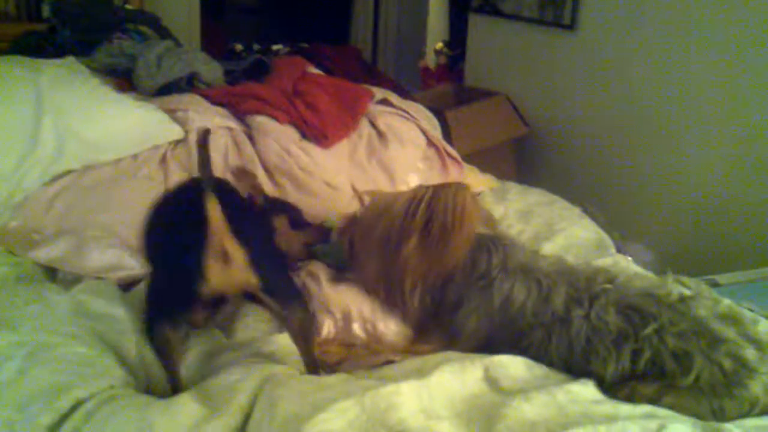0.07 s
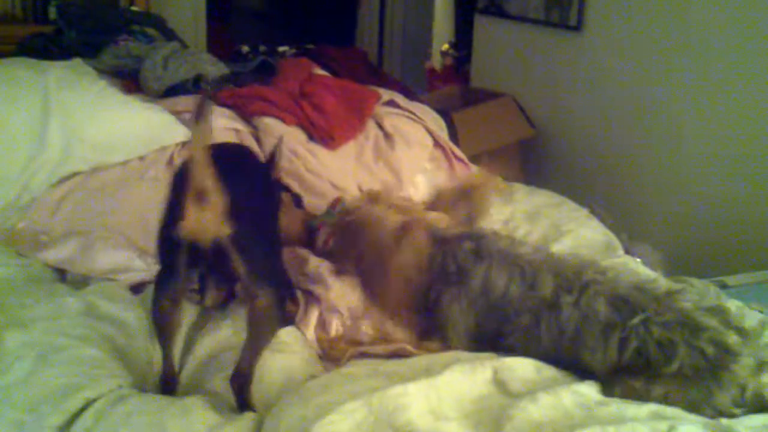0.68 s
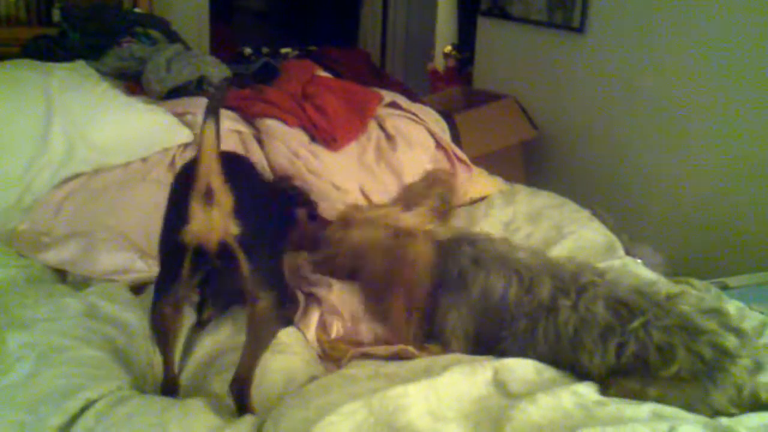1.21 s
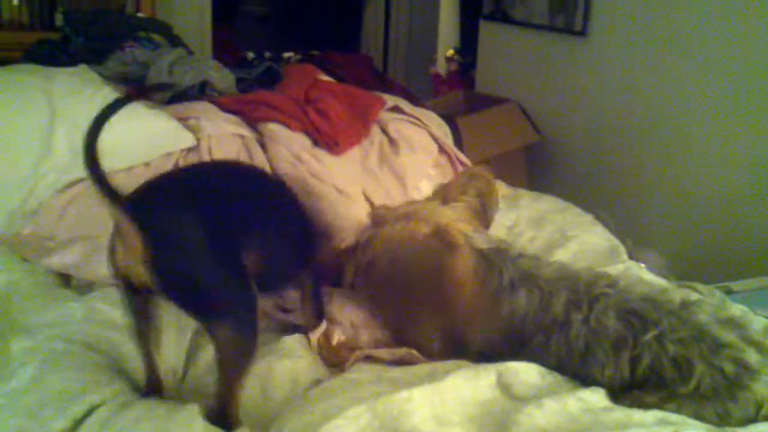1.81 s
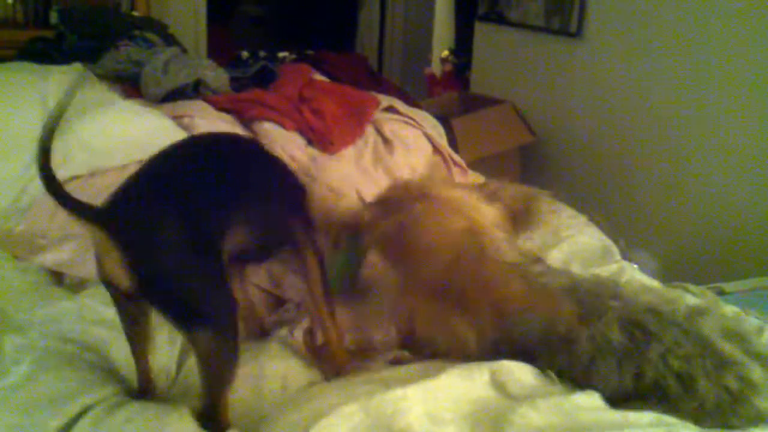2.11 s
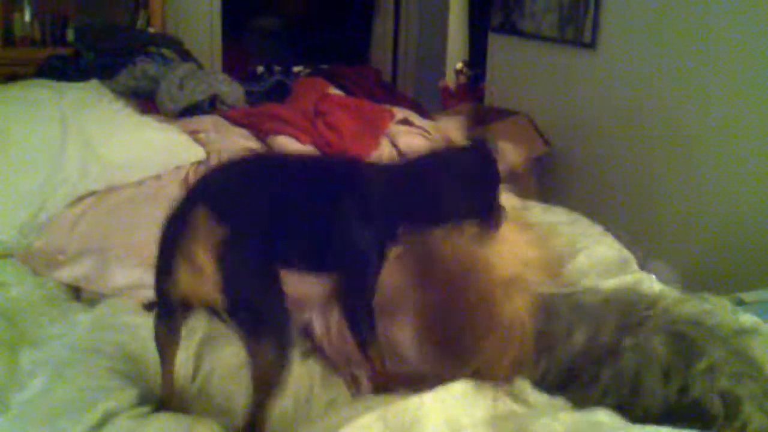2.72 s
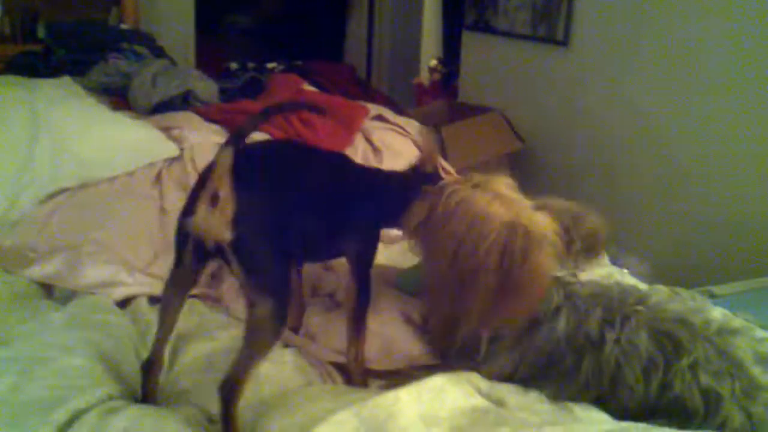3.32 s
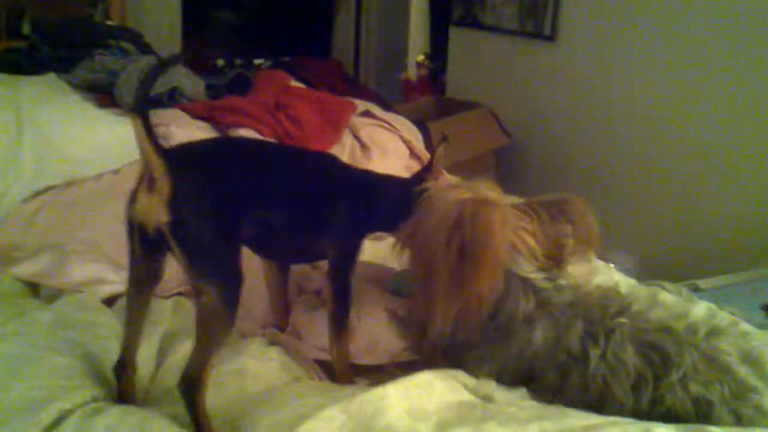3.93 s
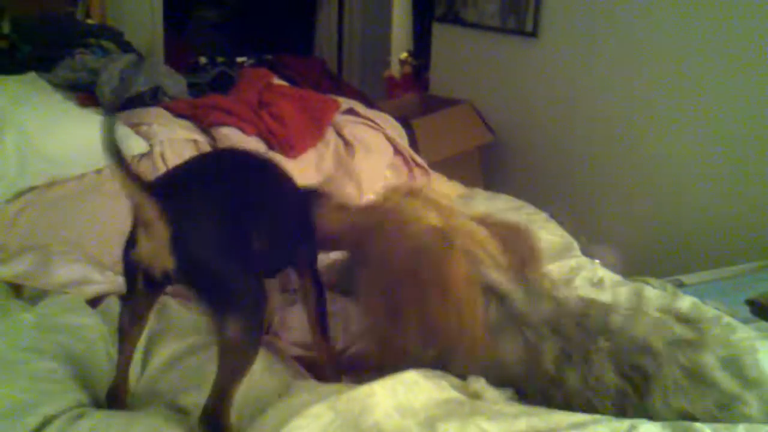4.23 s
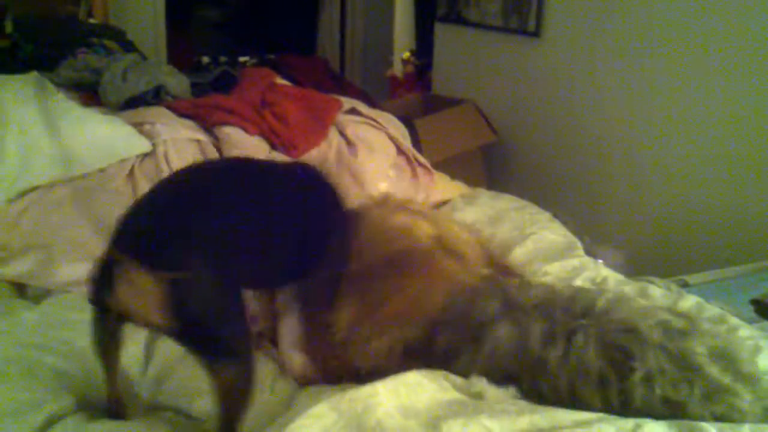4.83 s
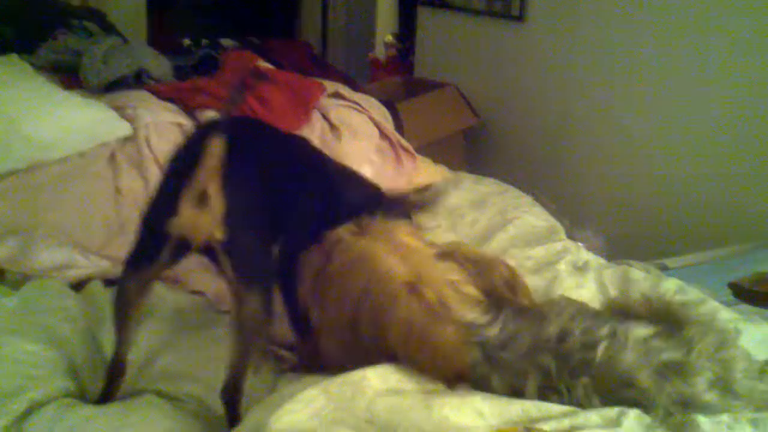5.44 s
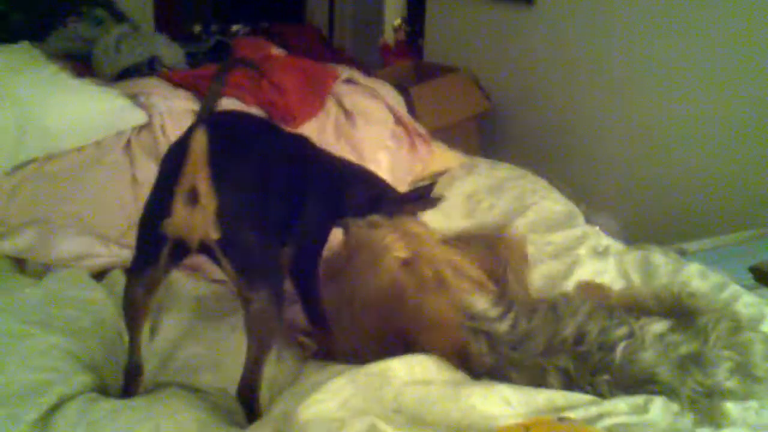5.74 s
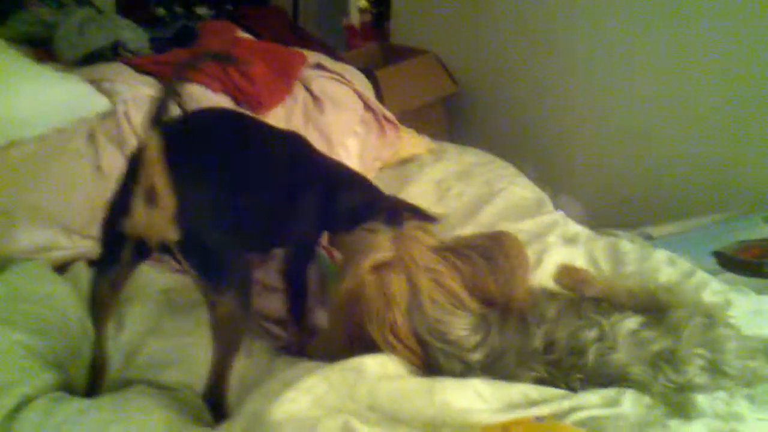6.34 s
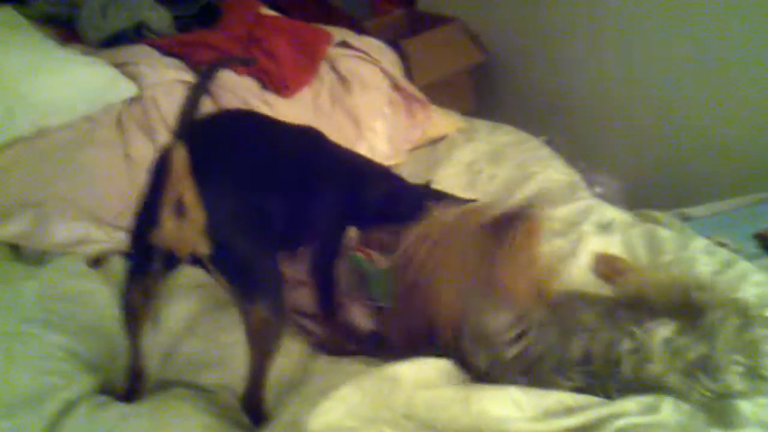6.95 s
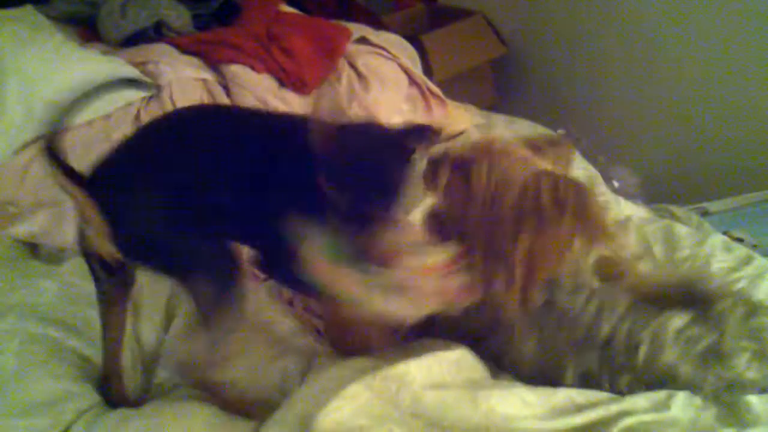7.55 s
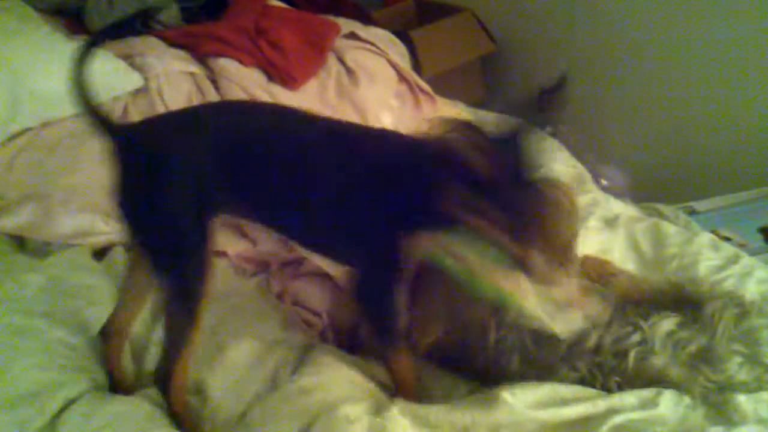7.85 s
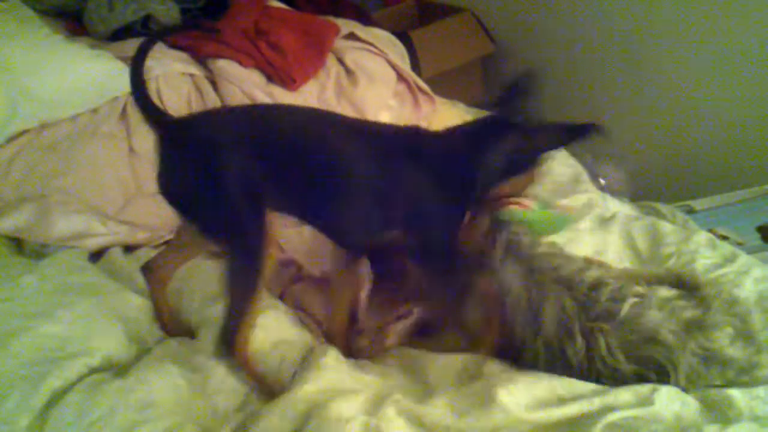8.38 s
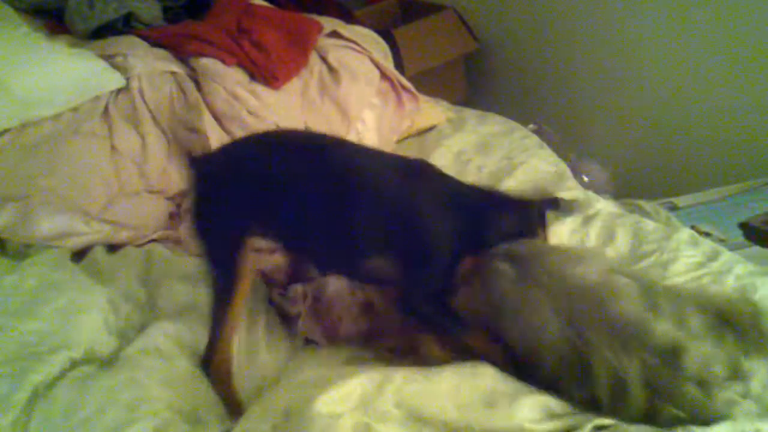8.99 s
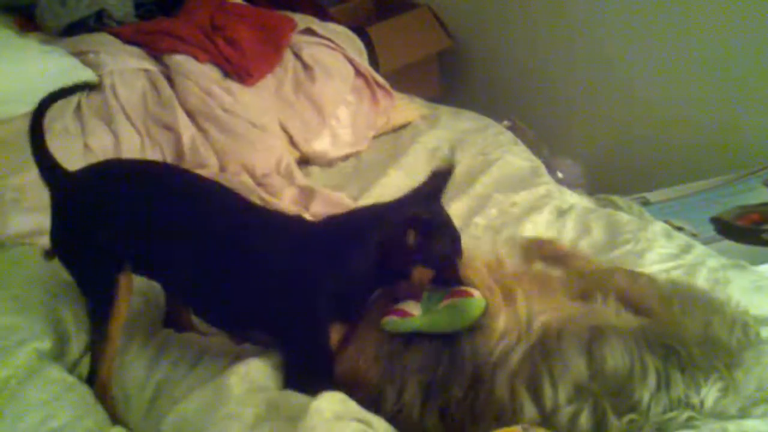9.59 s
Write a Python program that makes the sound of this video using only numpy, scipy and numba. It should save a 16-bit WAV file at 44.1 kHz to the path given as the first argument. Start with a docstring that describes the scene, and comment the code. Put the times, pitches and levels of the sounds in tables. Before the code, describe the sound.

Playful, raspy growls from two small dogs come in clusters in a small room, over light rustling and soft hiss.

```python
"""Two small dogs growl in short, gruff bursts as they tug at a toy on a bed.
Each growl is a source and a filter: uneven vocal-fold pulses excite the resonances of throat and mouth,
and turbulent air rasps on each pulse. Effort swells, sags and is let go; tugs curl back the lips.
Teeth clack and the bedding rustles. A small bedroom reverberates over faint air and hiss,
and two microphone ports are cross-subtracted into a wide stereo picture."""
import sys
import numpy as np
from scipy import signal
from scipy.fft import rfft, irfft, next_fast_len
from scipy.io import wavfile
from scipy.ndimage import uniform_filter1d
from numba import njit

SR = 44100
rng = np.random.default_rng(int(sys.argv[2]) if len(sys.argv) > 2 else 0)


def put_to_file(sound):
    """Save the sound as 16-bit audio at rate SR, in the file named by the first command-line argument."""
    columns = np.atleast_2d(sound).T  # one column per channel
    safe = np.clip(columns, -1, 1)
    whole_steps = np.round(safe * 32767)
    wavfile.write(sys.argv[1], SR, whole_steps.astype(np.int16))


N = 426006
PORT_LAG = 17  # travel time of sound between the two ports, in samples


def dogs(release_s=0.22, pitch_lag_s=0.04, rasp_rise_db_per_s=8, surge_db=0.72):
    """Breath effort modulates the voice: level, pitch, brightness and rasp follow each growl's course."""
    # growls, valued at the crest: start_s, swell_s, hold_s, release_db_per_s, level_db, pitch_hz,
    # arch_octaves, bright_db, drift_db_per_s, rasp_db, mouth_shape, jitter_cycles, tone_db
    growls = [(1.72, 0.13, .14, 260, -51, 130, 0.23, -2.5, -16, -15, "shut", 0.18, -7.5),
              (1.835, 0.14, 0.23, 418, -40.5, 130.3, 0.055, -9.5, 3, -27.5, "shut", 0.07, -1.5),
              (2.296, 0.15, 0.34, 190, -37, 165.3, .2, -3, -17, -17, "bared", 0.11, -6.5),
              (2.893, .15, 0.4, 480, -38, 148, .22, -9, -14, -16.5, "shut", 0.12, -7),
              (4.135, 0.16, 0.27, 480, -39.5, 147.3, 0.18, -9, 14, -21.5, "clenched", 0.1, -1),
              (4.5, 0.028, 0.071, 262.5, -53.5, 154.1, 0.093, -10.5, 3, -14, "bared", 0.21, -4),
              (4.577, 0.18, 0.22, 300, -33, 171.5, 0.23, -8, -16, -18.5, "bared", .07, -1),
              (5.157, .14, 0.38, 400, -34.5, 169.7, .22, -6.5, -29, -17, "clenched", .09, -9.5),
              (7.281, 0.092, 0.14, 400, -41.5, 149.8, 0.16, -2, -10, -17.5, "snarl", 0.17, -3.5),
              (7.587, 0.09, 0.085, 452, -46, 133.4, .05, 0, 26, -16.5, "snarl", .14, -5),
              (7.943, 0.046, 0.052, 240, -41, 153.1, 0.11, -20, 107, -29.5, "open", 0.14, -11.5),
              (8.484, 0.16, 0.24, 420, -33, 180.5, 0.14, -2.5, 10, -17.5, "open", .07, -9.5),
              (8.884, 0.094, 0.24, 266, -34, 172.1, -.03, -3.5, 12, -20.5, "gaping", .12, -7.5),
              (9.333, 0.019, 0.16, 404, -42, 143.9, -0.011, -5, -39, -11.5, "slack", 0.15, -7.5)]
    # the resonance that rises as the jaw opens: time_s, resonance_hz
    jaw = [(2.1, 1250), (2.33, 1370), (2.43, 1340), (2.6, 1176), (4.35, 1287), (4.75, 1200), (5.27, 1170),
           (5.4, 1130), (7.33, 1140), (7.4, 1290), (7.43, 1590), (7.6, 1000), (7.65, 1240), (7.7, 1740),
           (8.5, 1160), (8.57, 1340), (8.72, 1300), (8.91, 1410), (9.01, 1620), (9.19, 1530), (9.35, 1270),
           (9.5, 1230)]
    out, t = np.zeros(N), np.arange(N) / SR
    for start, swell_s, hold_s, release, db, hz, octaves, bright_db, drift, rasp_db, *manner in growls:
        at = slice(int(start * SR), int((start + hold_s + release_s) * SR))
        age = t[at] - start
        arch, fall = effort(age, swell_s, hold_s, release)
        tug_level, tug_bright, tug_rasp = tugging(t[at])
        # the voice catches from below full level and the mouth opens late: the onset is soft and dark
        catch = 15 * np.exp(-age / (0.097 * swell_s))
        closed = 8 * np.exp(-age / (0.19 * swell_s))
        from_peak = 2 * age / (hold_s + pitch_lag_s) - 1
        pitch_hz = hz * 2 ** (-octaves * np.minimum(from_peak ** 2, 1))
        jaw_hz = np.interp(t[at], *np.transpose(jaw))
        level = db + arch + fall - catch + tug_level + surge_db * wander(age, 26.8)
        # on release, mouth and rasp lose only part of what the chest loses
        bright = bright_db + drift * (age - swell_s) - closed - 0.29 * fall + tug_bright
        rasp = rasp_db + rasp_rise_db_per_s * (age - swell_s) - closed - 0.54 * fall + tug_rasp
        out[at] += growl(age, pitch_hz, jaw_hz, level, bright, rasp, *manner)
    return out


def effort(age, swell_s, hold_s, release_db_per_s, swell_db_per_s=39.5, sag_db_per_s=32.5):
    """Exponential growth and decay, in dB: the arch about the crest, and the fall after release."""
    arch = -swell_db_per_s * np.maximum(swell_s - age, 0) - sag_db_per_s * np.maximum(age - swell_s, 0)
    return arch, -release_db_per_s * np.maximum(age - hold_s, 0)


def tugging(t):
    """A tug drives more air and curls the lips: Gaussian shifts of level, brightness and rasp in dB."""
    # tugs on the toy: time_s, sigma_s, level_db, bright_db, rasp_db
    tugs = [(2.088, 0.014, 3, 3, 12), (2.34, 0.024, 4, -1.5, -2), (4.723, 0.0077, 1.5, -7, -1),
            (4.395, 0.028, 1, 1, 5), (4.768, 0.0098, -1, 3.5, 5), (4.846, 0.02, 0.5, 9, 1),
            (5.328, 0.029, 1, 4, 0.5), (5.456, 0.021, 5, -1, -4.5), (5.527, 0.024, 2, 6, 6),
            (8.018, 0.027, 1.5, 14, 12), (8.71, 0.012, 3.5, -1.5, 0), (9.04, 0.039, -2, 1.5, 12.5),
            (9.194, 0.023, -2, 7.5, 19), (9.107, 0.0042, -3, -8, 14), (9.487, 0.01, 4.5, 8, -3)]
    return sum(np.outer(shifts_db, bell(t - s, sigma_s)) for s, sigma_s, *shifts_db in tugs)


def growl(t, hz, jaw_hz, level_db, bright_db, rasp_db, mouth, jitter, tone_db, split_hz=800):
    """Source and filter: pulses and puffs ring the tract, over a chesty tone and under a dry rasp."""
    pulses, phase, angle, size = folds(t, hz, jitter)
    puffs = size * (0.33 + np.cos(np.pi * phase) ** 2) * rng.standard_normal(len(t))
    source = unit(pulses) + undb(-4.5) * unit(puffs)
    voice = vocal_tract(t, source, hz, jaw_hz, mouth)
    lips = steady(cut(cut(voice, split_hz, "high", order=6), 1980, "low"))
    # the smooth part of the airflow sounds as a firm tone, in step with the pulses
    flutter = uniform_filter1d(size, size=256) * undb(4 * wander(t, 75))
    tone = unit((np.cos(2 * angle) + undb(-11) * np.cos(angle)) * flutter)
    throat = steady(voice) + undb(tone_db) * tone
    chest = steady(cut(cut(throat, split_hz, "low", order=6), np.median(hz), "high", order=5))
    rasp = air_rasp(t, source, puffs, level_db, rasp_db)
    fade = np.clip(np.minimum(t - t[0], t[-1] - t) / .004, 0, 1)
    rattle_db = 2 * wander(t, 70)
    return fade * undb(level_db + rattle_db) * (chest + undb(bright_db) * lips + rasp)


def folds(t, hz, jitter, shimmer_db=2.0, throb_db=1.0, throb_hz=44):
    """Slack vocal folds oscillate with jitter and shimmer: pulses, cycle phase, smoothed angle, size."""
    chance = rng.standard_normal((256, 2))
    cycles = np.cumsum(hz) / SR
    closures = np.sort(np.arange(256) + jitter * (chance[:, 0] + .5 * np.cumsum(chance[:, 0])))
    phase = np.interp(cycles, closures - closures[0], np.arange(len(closures)))
    angle = 2 * np.pi * (cycles + uniform_filter1d(phase - cycles, size=400))
    cycle = phase.astype(int)
    # loose tissue above the folds flaps more slowly and makes the growl throb
    throb = np.sin(2 * np.pi * np.cumsum(throb_hz * (1 + 0.275 * wander(t, 31.6))) / SR)
    size = undb(shimmer_db * chance[cycle, 1] + throb_db * throb)
    return np.diff(cycle, prepend=cycle[0]) * size, phase % 1, angle, size


def vocal_tract(t, source, hz, jaw_hz, mouth, jaw_rest_hz=1330, jaw_follow=0.11):
    """Formants filter the source in parallel; one moves with the jaw, the mouth's others follow a bit."""
    # mouth_shape: jaw_level_db, then formants as centre_hz, width_hz, level_db
    mouths = { "shut": (-3.5, [(485, 180, -3), (640, 34, -1.5), (797, 57, -4.5), (985, 65, 5),
              (1895, 270, 1.5)]), "bared": (-9.5, [(482, 80, -11.5), (700, 400, -11), (966, 67, .5),
              (1768, 65, -0.5)]), "clenched": (-4, [(500, 78, -9.5), (610, 76, -5.5), (985, 100, 4),
              (1850, 110, -6.5)]), "open": (0, [(500, 65, -0.5), (643, 48, -2.5), (1040, 250, -8),
              (1754, 140, -3.5), (2020, 92, -5)]), "gaping": (-0.88, [(472, 96, -0.5), (630, 37, -2),
              (1010, 470, -5), (1320, 230, -4)]), "snarl": (8.2, [(486, 210, 2), (910, 120, -6),
              (1710, 160, 7.5)]), "slack": (4.1, [(535, 367, -4.5), (930, 55, 1), (1885, 560, -3.5)])}
    jaw_db, formants = mouths[mouth]
    opening = (jaw_hz / jaw_rest_hz) ** jaw_follow
    voice = sum(undb(db) * ring(source, f * opening * waver(t), float(width)) for f, width, db in formants)
    voice = voice + undb(jaw_db) * ring(source, jaw_hz * waver(t), 107.0)
    # the throat rings on the octave and on the pitch itself
    return voice + ring(source, 2 * hz, 95.0) + undb(-0.5) * ring(source, hz, 170.0)


def waver(t):
    """Random frequency modulation: the factor by which a resonance strays as the dog works the toy."""
    return 1 + 0.034 * wander(t, 26.9)


def air_rasp(t, source, puffs, level_db, rasp_db, snarl_hz=3120, sink_octaves_per_s=0.55, onset_db=-46):
    """Turbulence rasps past the teeth; pushed hard, the cavity behind them resonates in a snarl."""
    # spectrum of the rasp: frequency_hz, level_db
    spectrum = [(1800, -37), (2400, 5.5), (3000, 5.5), (3750, 6), (4300, -3), (5200, -4), (6500, -10),
                (8000, -9), (14000, -18)]
    rasp = steady(colour(puffs, spectrum)) * undb(rasp_db)
    centre_hz = snarl_hz * 2 ** (-sink_octaves_per_s * t) * waver(t)
    snarl = steady(ring(ring(source, centre_hz, 1000.0), centre_hz, 1000.0))
    return rasp + snarl * undb(rasp_db + 1.37 * (level_db + rasp_db - onset_db))


def brief_tones():
    """Gaussian-windowed sines: clean tones ring out within the growls, and a low hum lingers after one."""
    # brief clean tones: time_s, level_db, pitch_hz, sigma_s
    tones = [(2.47, -37.5, 552, 0.012), (2.665, -47.5, 277.5, 0.044), (5.332, -41.5, 635, 0.028),
             (8.627, -28.5, 672, 0.0055), (9.012, -30, 490, 0.0079)]
    out, t = np.zeros(N), np.arange(N) / SR
    for s, db, hz, sigma_s in tones:
        at = np.abs(t - s) < 10 * sigma_s
        out[at] += undb(db) * np.sqrt(2) * np.sin(2 * np.pi * hz * t[at]) * bell(t[at] - s, sigma_s)
    return out


def teeth(size=4096, enamel_hz=3430):
    """Impact excitation: a tick and a short scrape ring a broad resonance and the enamel."""
    # teeth striking the toy: time_s, level_db, centre_hz, scrape_t60_s, snap_db
    clacks = [(5.267, -32.5, 1140, .012, -21), (7.203, -42.5, 1180, 0.063, -13),
              (7.314, -35, 1750, .015, -28), (7.371, -37, 1380, .01, -34), (7.597, -37.5, 850, 0.012, -38),
              (7.772, -37.5, 1250, 0.026, -46)]
    out, t = np.zeros(N + size), np.arange(size) / SR
    for s, db, hz, t60, snap_db in clacks:
        blow = 0.045 * rng.standard_normal(size) * undb(-60 * t / t60)
        blow[0] += 1
        clack = cut(band(blow, hz), 1700, "low", order=3) + undb(snap_db) * band(blow, enamel_hz)
        out[int(s * SR):int(s * SR) + size] += undb(db) * clack / np.abs(clack).max()
    return out[:N]


def bedding(size=16384):
    """Friction on cloth makes short swells of grainy, band-limited noise."""
    # paws, fur and toy brushing the bedding: time_s, level_db, centre_hz, sigma_s
    rustles = [(0.063, -57, 1940, 0.01), (0.28, -64, 2100, 0.056), (0.748, -60, 1860, 0.0082),
               (1.495, -64, 890, 0.017), (1.741, -55, 1960, 0.031), (1.817, -60, 2100, 0.01),
               (2.023, -68, 6960, 0.066), (2.4, -61.5, 6600, 0.086), (5.038, -62.5, 1520, 0.069),
               (5.214, -61.5, 7900, 0.033), (5.726, -55, 1940, 0.02), (5.921, -63, 1850, 0.018),
               (7.096, -66.5, 1940, 0.053), (7.354, -61, 7900, 0.061), (7.581, -50, 1660, 0.0066),
               (7.82, -63, 1610, 0.061), (8.17, -64.5, 3060, 0.015), (8.316, -59, 1610, 0.044),
               (9.576, -51.5, 1510, 0.015)]
    out, t = np.zeros(N + 2 * size), (np.arange(size) - size // 2) / SR
    for s, db, hz, sigma_s in rustles:
        grains = rng.standard_normal(size) * undb(4.5 * wander(t, 300))
        at = int(s * SR) + size // 2
        out[at:at + size] += undb(db) * unit(band(grains, hz, 0.66)) * bell(t, sigma_s)
    return out[size:size + N]


def bedroom(x, size=16384, near_t60_s=0.082, tail_t60_s=0.35, tail_db=-13.5):
    """Convolution with the room's impulse response: direct sound, early reflections and a soft tail."""
    # standing waves between the walls lift and hollow the bass: frequency_hz, gain_db
    standing_waves = [(100, 4.5), (150, 2), (168, -4), (184, 2), (207, -2.5), (235, .5), (360, -0.5),
                      (470, 0)]
    t = np.arange(size) / SR
    decay = undb(-60 * t / near_t60_s) + undb(tail_db - 60 * t / tail_t60_s)
    impulse = undb(4.5) * unit(diffuse(size) * decay * (t > .002)) / np.sqrt(size)
    impulse = impulse - 0.9 * cut(impulse, 420, "low", order=1)  # the mattress absorbs low echoes
    impulse[:, 0] = 1  # direct sound
    length = next_fast_len(N + size)
    response = rfft(impulse, length)
    # the room response is evened out in the bass, so low echoes smear in time without booming
    power = uniform_filter1d(np.abs(response.mean(axis=0)) ** 2, int(50 * length / SR))
    bass_share = 1 / (1 + (np.arange(len(power)) * SR / length / 1500) ** 4)
    response = response / np.sqrt(bass_share * power + (1 - bass_share) * power.mean())
    return irfft(rfft(colour(x, standing_waves), length) * response, length)[:, :N]


def room_air(level_db=-64.5):
    """The room's quiet air is a diffuse noise field whose level drifts slightly."""
    # spectrum of the air: frequency_hz, level_db
    spectrum = [(40, -27), (200, -4.5), (400, -2), (900, -2), (2200, -7.5), (3500, -15), (5000, -15),
                (14000, -67)]
    air = unit(colour(diffuse(next_fast_len(N)), spectrum))[:, :N]
    return air * undb(level_db + .5 * wander(np.arange(N) / SR, 9.2))


def port_hiss(level_db=-62.5):
    """Self-noise: each port adds its own uncorrelated hiss."""
    # spectrum of the hiss: frequency_hz, level_db
    spectrum = [(30, 13), (250, 11.5), (1500, -1.5), (5000, -7.5), (8000, -2), (14000, -1.5)]
    noise = rng.standard_normal((2, next_fast_len(N)))
    return undb(level_db) * unit(colour(noise, spectrum))[:, :N]


def diffuse(size):
    """Diffuse-field coherence follows a sinc law: the ports agree in the bass, not in the treble."""
    noise = rng.standard_normal((2, size))
    coherence = np.sinc(2 * freqs(noise) * PORT_LAG / SR)
    mid, side = irfft(rfft(noise) * np.sqrt([1 + coherence, 1 - coherence]), size)
    return np.array([mid + side, mid - side])


@njit
def ring(x, hz, width_hz):
    """A second-order resonator whose centre may move; gain 1 at the centre."""
    y, band_state, low_state = np.empty(len(x)), 0., 0.
    for i in range(len(x)):
        g, damping = np.tan(np.pi * hz[i] / SR), width_hz / hz[i]
        v = (band_state + g * (x[i] - low_state)) / (1 + g * (g + damping))
        band_state, low_state = 2 * v - band_state, low_state + 2 * g * v
        y[i] = damping * v
    return y


def band(x, hz, width_share=1):
    """Two resonators in cascade make a broad, steep-sided band."""
    centre, width_hz = np.full(len(x), float(hz)), float(width_share * hz)
    return ring(ring(x, centre, width_hz), centre, width_hz)


def cut(x, hz, kind, order=4):
    """A maximally flat low-pass or high-pass."""
    return signal.sosfilt(signal.butter(order, hz, kind, fs=SR, output="sos"), x)


def colour(x, points):
    """Zero-phase filtering through (frequency_hz, gain_db) points."""
    hz, db = np.transpose(points)
    return irfft(rfft(x) * undb(np.interp(np.log(freqs(x) + 1), np.log(hz), db)), x.shape[-1])


def freqs(x):
    """The frequency of each spectral bin, in Hz."""
    return np.arange(x.shape[-1] // 2 + 1) * SR / x.shape[-1]


def steady(x, span_s=0.044):
    """Division by the running rms evens out slow swells and keeps single pulses."""
    return x / np.sqrt(np.abs(uniform_filter1d(x ** 2, int(span_s * SR))) + 1e-4 * np.mean(x ** 2))


def wander(t, per_s):
    """Interpolated noise that reaches a new value `per_s` times a second."""
    return np.interp((t - t[0]) * per_s, np.arange(1024), rng.standard_normal(1024))


def bell(t, sigma_s):
    """A Gaussian envelope about t = 0."""
    return np.exp(-.5 * (t / sigma_s) ** 2)


def unit(x):
    """Scale to an rms of 1."""
    return x / np.sqrt(np.mean(x ** 2))


def undb(db):
    """Decibels to amplitude gain."""
    return 10 ** (np.asarray(db) / 20)


def scene():
    """Superposition: dogs, teeth and bedding in the room, extra direct clack, then air and hiss."""
    air, hiss = room_air(), port_hiss()
    voices, clacks = dogs() + brief_tones(), teeth()
    return bedroom(voices + undb(4) * clacks + bedding()) + clacks + air + hiss


def record(dry, lift_hz=100, lift_db=18.5, mismatch_db=-1.72, top_hz=13900):
    """Differential pickup: each channel subtracts the other port, delayed; a lift restores the lows."""
    ports = dry * undb([[-mismatch_db], [mismatch_db]])
    opposite = np.pad(ports[::-1], ((0, 0), (PORT_LAG, 0)))[:, :N]
    wide = (ports - opposite) / 2
    lifted = wide + undb(lift_db) * cut(wide, lift_hz, "low", order=1)
    trimmed = cut(lifted, 105, "high", order=2)
    return signal.sosfilt(signal.ellip(10, .1, 70, top_hz, fs=SR, output="sos"), trimmed)


dry = scene()
out = record(dry)
put_to_file(out)
```